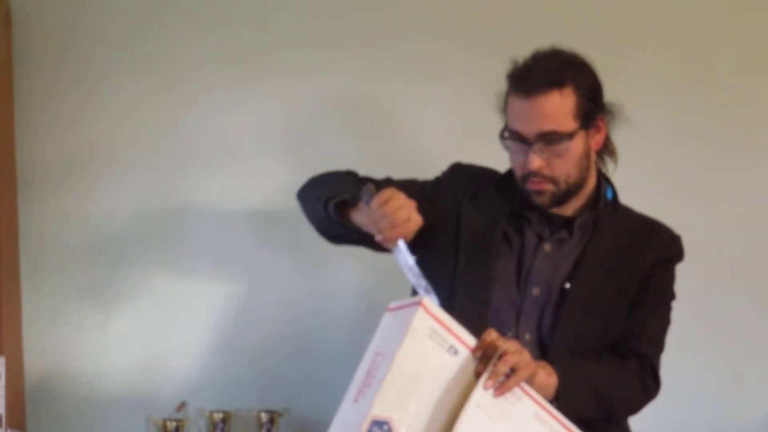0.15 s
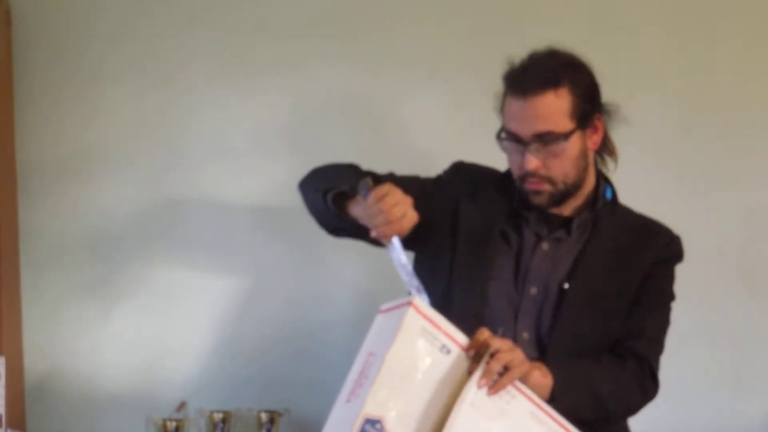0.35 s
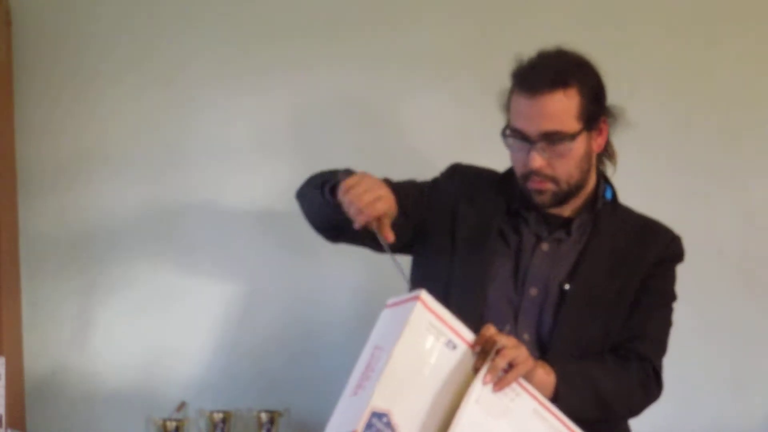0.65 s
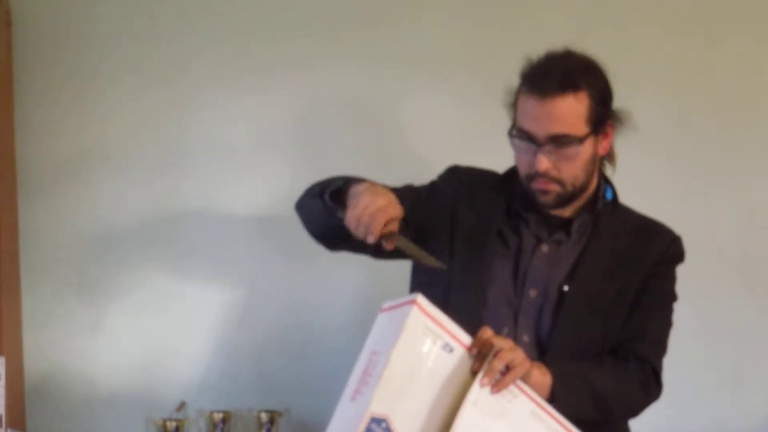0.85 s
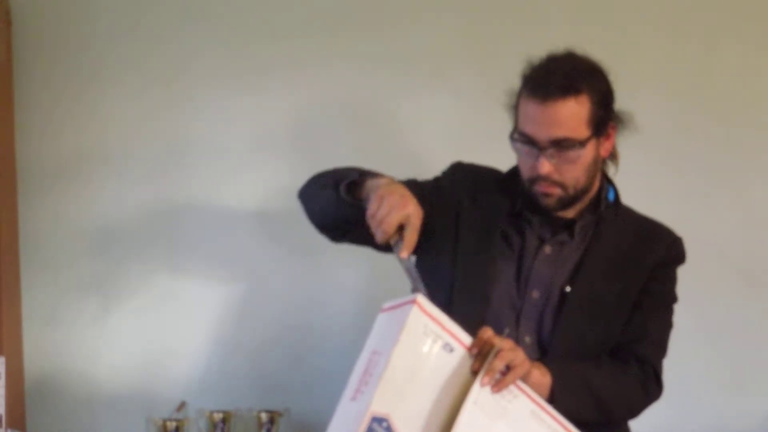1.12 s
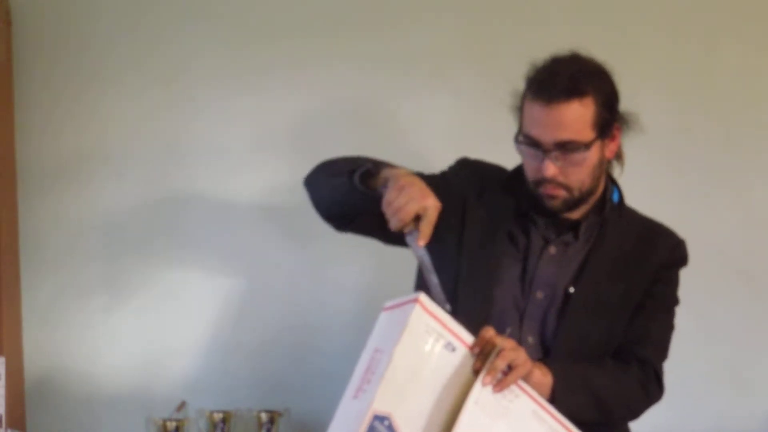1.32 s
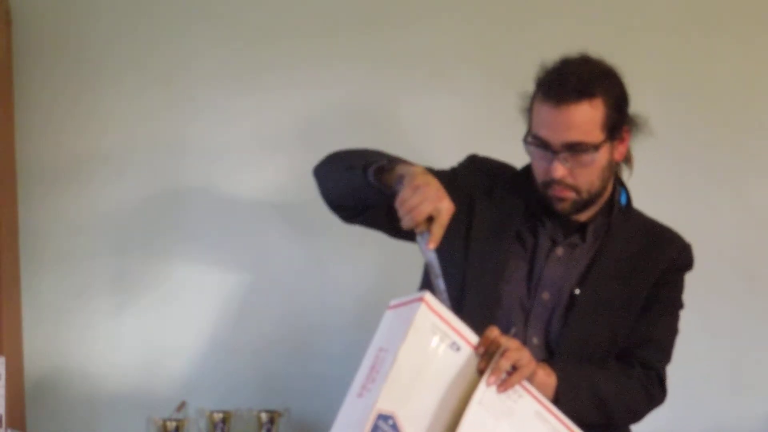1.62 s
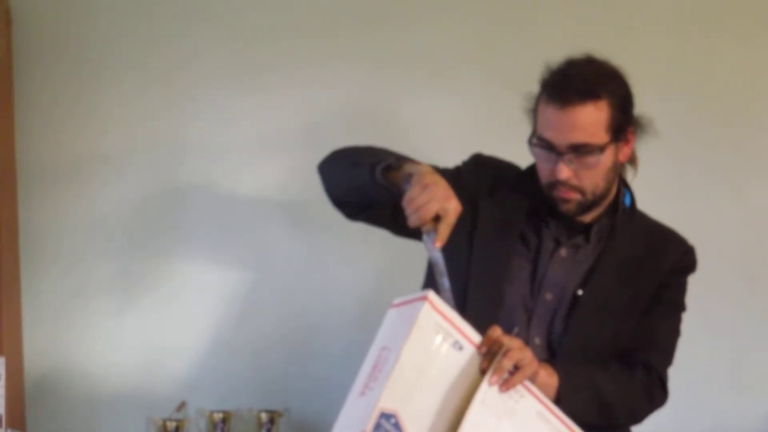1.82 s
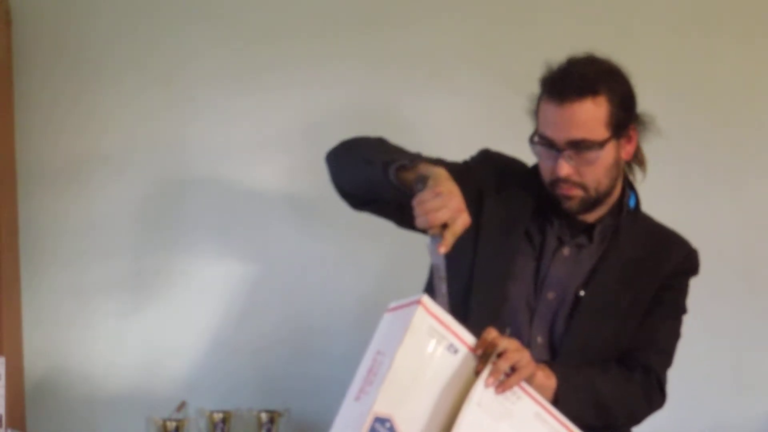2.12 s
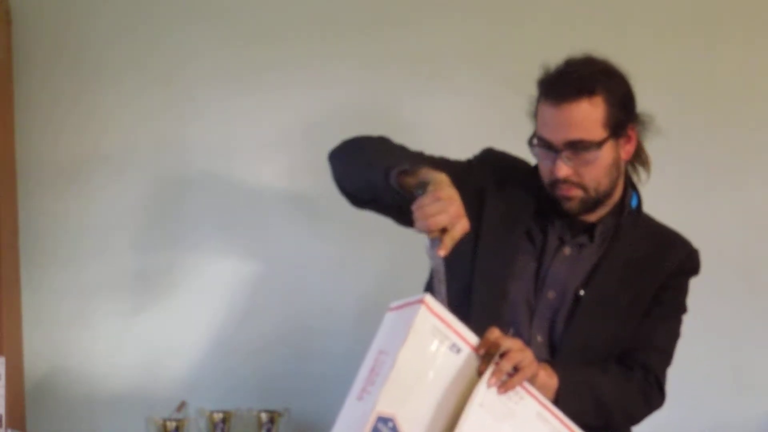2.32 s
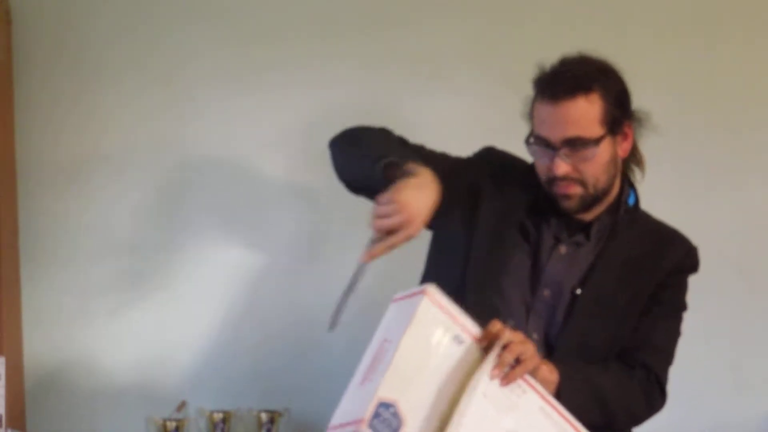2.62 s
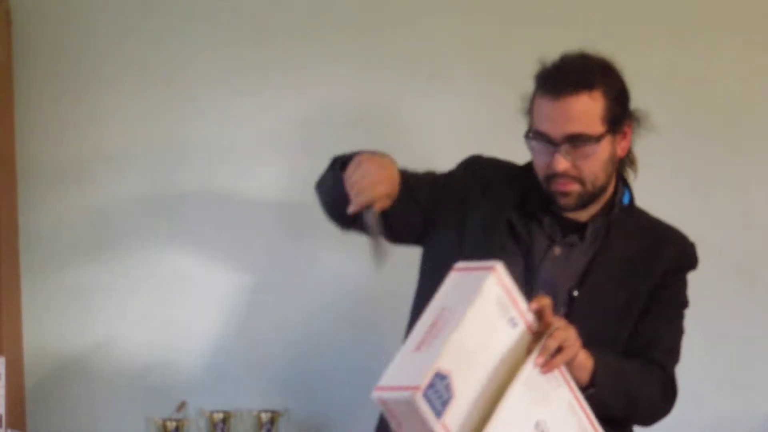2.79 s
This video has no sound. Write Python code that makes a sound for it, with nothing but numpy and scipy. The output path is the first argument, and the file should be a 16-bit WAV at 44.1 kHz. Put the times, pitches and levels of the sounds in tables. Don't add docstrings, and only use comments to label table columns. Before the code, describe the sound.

A knife cuts a hollow cardboard box, close up in a quiet, slightly live room. At 0.1 s it bites with bright fibre crackle and boxy knocks, rasping until 0.3. Small wiggles follow at 0.35 and 0.63, faint nudges at 1.15 and 1.33, then near silence. It stabs at 2.1-2.2, levers with creaks from 2.4, rips roughly at 2.6-2.7, and ends with light scrapes over low rumble and hiss.

```python
import sys
import numpy as np
from scipy import signal
from scipy.fft import rfft, irfft, next_fast_len
from scipy.io import wavfile
from scipy.ndimage import uniform_filter1d

SR = 44100
rng = np.random.default_rng(int(sys.argv[2]) if len(sys.argv) > 2 else 0)


def output_pcm(signal):
    pcm = np.clip(np.atleast_2d(signal).T, -1, 1) * 32767
    wavfile.write(sys.argv[1], SR, np.round(pcm).astype(np.int16))


def level_to_linear(level):
    exponent = np.asarray(level, float) / 20
    return 10 ** exponent


N = 130095


def evened(x):
    return x / np.sqrt(np.mean(x ** 2) + 1e-20)


def read(points, hz):
    f, value = np.transpose(points)
    return np.interp(np.log(hz + 1), np.log(f + 1), value)


def coloured(x, points):
    hz = abs(np.fft.fftfreq(4096, 1 / SR))
    below = (points[0][0] / 3, points[0][1] - 30)
    above = (SR / 2, points[-1][1] - 10)
    logs = read([below] + list(points) + [above], hz) * np.log(10) / 20
    response = np.exp(np.conj(signal.hilbert(logs)))
    impulse = np.fft.ifft(response).real[:2048]
    return signal.oaconvolve(x, impulse)[:len(x)]


def rings(x, modes):
    out = np.zeros(len(x))
    for k, (hz, width, db) in enumerate(modes):
        r = np.exp(-np.pi * width / SR)
        pole = r * np.exp(2j * np.pi * hz / SR)
        ring = 2 * signal.lfilter([1 - r], [1, -pole], x).real
        out += (-1) ** k * level_to_linear(db) * ring
    return out


def snaps(per_s, spread_db):
    size = level_to_linear(spread_db * np.minimum(rng.exponential(1, N), 4))
    size = size * rng.choice([-1., 1.], N)
    return evened(size * (rng.random(N) < per_s / SR))


def air():
    # frequency in Hz, level in dB per Hz
    air_tone = [(20, -4), (60, -4), (122, -10.5), (443, -14), (745, -17.5), (5000, -26), (11000, -27.5),
                (14000, -28)]
    # frequency in Hz, left-right likeness from 0 to 1
    air_same = [(60, 0.85), (230, 0.57), (920, 0.22), (3590, 0.013), (14000, 0.027)]
    # frequency in Hz, left minus right in dB
    air_lean = [(60, 0), (370, -1), (2280, -0.5), (14000, -1.0)]
    level_db, patch_db = -52.5, 0.29
    frames, hz = N // 512 + 5, np.fft.rfftfreq(2048, 1 / SR)
    a, b, c, d, patches = rng.standard_normal((frames, 1025, 5)).T
    patches = uniform_filter1d(patches, size=20, axis=0)
    patches = evened(uniform_filter1d(patches, size=6, axis=1))
    same = np.clip(read(air_same, hz), -1, 1)[:, None]
    left, other = a + 1j * b, c + 1j * d
    z = np.array([left, same * left + np.sqrt(1 - same ** 2) * other])
    lean = read(air_lean, hz)[:, None] / 2
    z *= level_to_linear(read(air_tone, hz)[:, None] + patch_db * patches + np.array([lean, -lean]))
    out = signal.istft(z, nperseg=2048, noverlap=1536)[1][:, :N]
    return level_to_linear(level_db) * out / np.std(out.mean(0))


def blade():
    # time in seconds, speed in dB, pressure in dB
    entry = [(0.072, -68, -58), (0.079, -50, -36), (0.082, -45.5, -42), (0.102, -42, -33.5),
             (0.109, -33.5, -38), (0.118, -26.5, -40), (0.13, -36, -31)]
    first_cut = [(0.129, -35, -33), (0.142, -35.5, -31.5), (0.202, -42, -30), (0.324, -69.5, -57),
                 (0.34, -62, -48)]
    first_wiggles = [
        [(0.34, -63, -58), (0.36, -46.5, -48.5), (0.428, -51, -39.5), (0.486, -64, -51.5), (0.554, -80, -66),
         (0.58, -79, -58)],
        [(0.6, -75, -66), (0.62, -78, -54), (0.63, -62, -45), (0.652, -60.5, -45), (0.74, -69, -63),
         (0.76, -65, -61)],
    ]
    searching = [
        [(0.9, -60, -62), (0.91, -62, -80), (0.926, -59.5, -72), (0.944, -65, -70), (0.96, -64, -71)],
        [(1.13, -71, -59), (1.182, -57, -49.5), (1.206, -65, -65), (1.218, -62, -59), (1.3, -71, -78)],
        [(1.325, -63, -50), (1.336, -49.5, -45.5), (1.391, -64, -52.5), (1.451, -70, -69), (1.48, -73, -78)],
    ]
    stab = [(2.07, -64, -96), (2.098, -63, -47), (2.174, -52.5, -44), (2.189, -42, -38.5),
            (2.2, -45.5, -42), (2.232, -48, -46.5), (2.25, -57, -44), (2.32, -71, -61), (2.34, -68, -63)]
    lever = [(2.339, -76, -70), (2.362, -54, -61), (2.377, -52, -43.5), (2.406, -54.5, -49),
             (2.428, -43.5, -45), (2.442, -44.5, -41.5), (2.516, -50, -46), (2.53, -49, -35)]
    rip = [(2.529, -45, -44), (2.594, -40.5, -36), (2.602, -33, -36.5), (2.613, -34.5, -29),
           (2.63, -37, -35.5), (2.654, -27, -30), (2.708, -38.5, -37.5), (2.742, -50, -36),
           (2.76, -48, -51)]
    tilt = [(2.76, -50, -42.5), (2.816, -54.5, -55), (2.836, -47.5, -48.5), (2.881, -51, -51.5),
            (2.897, -46.5, -50.5), (2.93, -53, -48), (2.95, -52, -40)]
    rest_db = -85.0
    t, out = np.arange(N) / SR, np.full((2, N), rest_db)
    for stroke in [entry, first_cut, *first_wiggles, *searching, stab, lever, rip, tilt]:
        s, *controls = np.transpose(stroke)
        out = np.maximum(out, [np.interp(t, s, c, rest_db, rest_db) for c in controls])
    return uniform_filter1d(out, size=60, axis=1)


def fibres(speed_db):
    # frequency in Hz, level in dB per Hz
    fibre_tone = [(2500, -31), (4000, -9.5), (6000, -9.5), (8500, -6), (10500, -0.5), (12000, 1),
                  (14000, -7)]
    # start in seconds, peak in dB
    cracks = [(.0784, -44), (.0815, -39), (.0842, -38), (.098, -33), (.1054, -29), (.1101, -19),
              (.1179, -12.5), (.1217, -25), (.1656, -29), (.238, -41), (.3532, -43), (.3592, -41),
              (.3713, -38), (.3757, -39), (1.3326, -42), (1.3355, -43), (2.182, -39), (2.185, -40),
              (2.1896, -35), (2.3679, -44), (2.3815, -42), (2.4327, -35), (2.4541, -36), (2.4628, -38),
              (2.4856, -39), (2.5631, -32), (2.6024, -24), (2.6445, -22), (2.6578, -23), (2.7757, -41),
              (2.839, -40), (2.8898, -38), (2.898, -37)]
    fibres_per_s, spread_db, clump_db = 16000, 3, 0.5
    fibre_db, crack_db = 2, 9
    clumps = evened(uniform_filter1d(rng.standard_normal(N), size=130))
    breaks = snaps(fibres_per_s, spread_db) * level_to_linear(clump_db * clumps)
    norm = np.std(coloured(breaks, fibre_tone))
    breaks = breaks * level_to_linear(speed_db + fibre_db)
    for s, db in cracks:
        breaks[round(s * SR)] = level_to_linear(db + crack_db)
    twin = breaks * rng.choice([-1., 1.], N)
    return coloured(breaks, fibre_tone) / norm, coloured(twin, fibre_tone) / norm


def dragged(x):
    # time in seconds, gain of the coarse part in dB
    drag = [
        (.05, -7),
        (.3, -2),
        (.5, 0),
        (1.3, 5),
        (1.5, 10),
        (2.1, 0),
        (2.95, 2),
    ]
    coarse_hz = 7800
    coarse = signal.sosfiltfilt(signal.butter(2, coarse_hz, fs=SR, output="sos"), x)
    gain = level_to_linear(np.interp(np.arange(N) / SR, *np.transpose(drag)))
    return x + (gain - 1) * coarse


def panel(speed_db, press_db):
    # frequency in Hz, level in dB per Hz
    panel_tone = [(450, -24), (700, -3), (1200, -2.5), (1700, -4), (3200, -7), (4200, -14), (7000, -21),
                  (10000, -34)]
    # frequency in Hz, width in Hz, level in dB
    panel_rings = [(1040, 10.4, -11.5), (1366, 20, 0), (1761, 17, -7), (2367, 16, -11), (2453, 23, -6.5),
                   (2830, 10, -3), (2948, 33, -7.5), (3412, 17, -12), (3947, 24, -6)]
    # start in seconds, peak in dB
    taps = [
        (0.0814, -43),
        (0.1176, -43),
        (0.633, -41.5),
        (1.147, -34.5),
        (1.334, -41.5),
        (2.0892, -35),
        (2.19, -25.5),
        (2.4157, -31.5),
        (2.643, -24),
    ]
    # start in seconds, peak in dB
    knocks = [(.0922, -36), (.1016, -33), (.111, -30), (.1188, -28), (.1509, -29), (.1645, -29),
              (.1722, -28), (.2095, -33), (.2489, -37), (.4102, -39), (1.1595, -42), (1.338, -41),
              (2.0949, -40), (2.1912, -32), (2.1972, -31), (2.2034, -33), (2.6046, -26), (2.6133, -26),
              (2.6182, -27), (2.6333, -27), (2.6445, -23), (2.6549, -23)]
    rasp_db, speed_share, rasp_per_s, rasp_spread_db, clump_db = -3, 0.49, 8000, 0.31, 1.5
    tap_db, tap_t60_s, knock_db = -13.5, 0.17, 2
    t = np.arange(N) / SR
    drive = level_to_linear(speed_share * speed_db + (1 - speed_share) * press_db + rasp_db)
    for s, db in taps:
        tap = (t > s) * level_to_linear(db + tap_db - 60 * np.maximum(t - s, 0) / tap_t60_s)
        drive = np.hypot(drive, tap)
    rasp = snaps(rasp_per_s, rasp_spread_db)
    clumps = evened(uniform_filter1d(uniform_filter1d(rasp, size=150), size=150))
    rasp = rasp * level_to_linear(clump_db * clumps)

    def through_panel(x):
        return coloured(x, panel_tone) + rings(x, panel_rings)

    drive = rasp * drive
    for s, db in knocks:
        drive[round(s * SR)] += level_to_linear(db + knock_db)
    return through_panel(drive) / np.std(through_panel(rasp))


def box(press_db):
    # frequency in Hz, width in Hz, level in dB
    walls = [(340, 43, -7), (398, 13, -3), (437, 13.6, -1.5), (490, 12, -0.5), (556.3, 37, -3),
             (701, 29, -7.5), (760, 9.7, -3), (878, 28, -11)]
    # frequency in Hz, width
    # in Hz, level in dB
    shell = [(68, 17, -9.5), (176, 41, -8), (217, 42, -7), (268, 30, -4.5)]
    box_db, slips_per_s, spread_db = -5, 500, 2
    shell_pivot_db, steepness = -40.5, 0.93
    slips = snaps(slips_per_s, spread_db)
    shell_press_db = shell_pivot_db + steepness * (press_db - shell_pivot_db)
    both = rings(slips * level_to_linear(press_db), walls) + rings(slips * level_to_linear(shell_press_db), shell)
    return level_to_linear(box_db) * both / np.std(rings(slips, walls + shell))


def jolts():
    # start in seconds, peak in dB, wall pitch in Hz, hold in seconds
    wall_jolts = [(.08, -49, 860, 0.045), (.095, -39.5, 268, 0.031), (.105, -36, 575, 0.017),
                  (.112, -32, 437, 0.0082), (.115, -38, 490, 0.02), (.135, -50, 760, 0.041),
                  (.15, -33.5, 268, 0.032), (.15, -35, 222.4, 0.036), (.155, -35.5, 556.3, 0.044),
                  (.155, -40, 706, 0.022), (.16, -46.5, 1040, .025), (.175, -36.5, 437, 0.022),
                  (.178, -33.5, 490, 0.044), (.235, -46, 437, .015), (.26, -42.5, 495.3, 0.021),
                  (.275, -51, 331.4, 0.013), (.39, -45, 220.6, 0.031), (.41, -44, 485, 0.018),
                  (.64, -47.5, 490, 0.016), (1.335, -54.5, 420, 0.016), (2.178, -36, 567.4, 0.018),
                  (2.18, -37, 458, 0.016), (2.18, -45, 866, 0.011), (2.18, -42, 239.2, 0.023),
                  (2.26, -49, 524, .015), (2.425, -47.5, 551, 0.017), (2.43, -46.5, 212, 0.033),
                  (2.435, -46, 727, 0.013), (2.45, -52, 455, .05), (2.54, -47, 265, 0.015),
                  (2.59, -35, 556, 0.015), (2.595, -39.5, 224.4, 0.026), (2.6, -42, 469.5, 0.0091),
                  (2.61, -37.5, 400, 0.029), (2.64, -32.5, 545, .022), (2.632, -35.5, 265, 0.022),
                  (2.645, -38, 696, .02), (2.65, -36, 398, 0.034), (2.645, -32, 223.7, 0.044),
                  (2.695, -39, 563, 0.012), (2.7, -39, 407.2, .012), (2.855, -54.5, 578, 0.017),
                  (2.905, -48.5, 570, .04)]
    rise_s, t60_s, wobble_depth = 0.011, 0.1, 0.21
    t, out = np.arange(N) / SR, np.zeros(N)
    wobble = uniform_filter1d(rng.standard_normal((2, N)), size=500)
    wobble = evened(uniform_filter1d(wobble, size=500))
    for k, (s, db, hz, hold) in enumerate(wall_jolts):
        u = np.maximum(t - s, 0)
        rise = np.sin(np.pi / 2 * np.minimum(u / rise_s, 1)) ** 2
        fall = level_to_linear(db - 60 * np.maximum(u - rise_s - hold, 0) / t60_s)
        a, b = wobble_depth * np.roll(wobble, k * N // len(wall_jolts), axis=1)
        tone = ((1 + a + 1j * b) * np.exp(2j * np.pi * hz * t)).real
        out += rise * fall * tone
    return out


def ports(x, twin):
    # frequency in Hz, left-right likeness from 0 to 1
    near_same = [(60, 0.87), (2000, 0.91), (6000, 0.98), (7500, 0.4), (10000, 0.24), (14000, 0.091)]
    # frequency in Hz, left minus right in dB
    near_lean = [(60, -8), (300, -.5), (5000, -0.5), (8000, -2.5), (14000, -4)]
    size = next_fast_len(N + 4096)
    hz = np.fft.rfftfreq(size, 1 / SR)
    same = np.clip(read(near_same, hz), 0, 1)
    lean = read(near_lean, hz) / 2
    mid = rfft(x, size) * np.sqrt((1 + same) / 2)
    side = rfft(twin, size) * np.sqrt((1 - same) / 2)
    return irfft([(mid + side) * level_to_linear(lean), (mid - side) * level_to_linear(-lean)], size)[:, :N]


def room(x):
    # frequency in Hz, t60 in seconds
    room_t60 = [(100, 0.4), (500, 0.47), (3000, 0.43), (12000, 0.21)]
    # frequency in Hz, left-right likeness from 0 to 1
    room_same = [(100, 1), (1200, 0.94), (2300, 1), (6000, 1), (8000, 0.13)]
    echoes = np.zeros((2, SR // 2))
    at = np.arange(300, SR // 2 - 20, 20) + rng.integers(0, 20, (2, (SR // 2 - 301) // 20))
    np.put_along_axis(echoes, at, rng.choice([-1., 1.], at.shape), 1)
    hz, t, z = signal.stft(echoes, SR, nperseg=256)
    same = np.clip(read(room_same, hz), 0, 1)[:, None]
    z = np.array([z[0], same * z[0] + np.sqrt(1 - same ** 2) * z[1]])
    decay = level_to_linear(-60 * t / read(room_t60, hz)[:, None])
    tail = signal.istft(z * decay, SR, nperseg=256)[1]
    return signal.fftconvolve(x[None], tail / np.linalg.norm(tail[0]), axes=1)[:, :N]


def scene():
    speed_db, press_db = blade()
    crackle, twin = map(dragged, fibres(speed_db))
    near = crackle + panel(speed_db, press_db) + box(press_db) + jolts()
    room_db = -11
    return ports(near, twin) + level_to_linear(room_db) * room(near) + air()


def top_cut(x):
    return signal.sosfilt(signal.butter(12, 14440, fs=SR, output="sos"), x)


def record(dry):
    edge_hz = 14310
    lowpass = signal.firwin(2047, edge_hz, window=("kaiser", 9), fs=SR)
    limited = signal.oaconvolve(dry, lowpass[None], "same")
    return top_cut(limited)


dry = scene()
out = record(dry)
output_pcm(out)
```